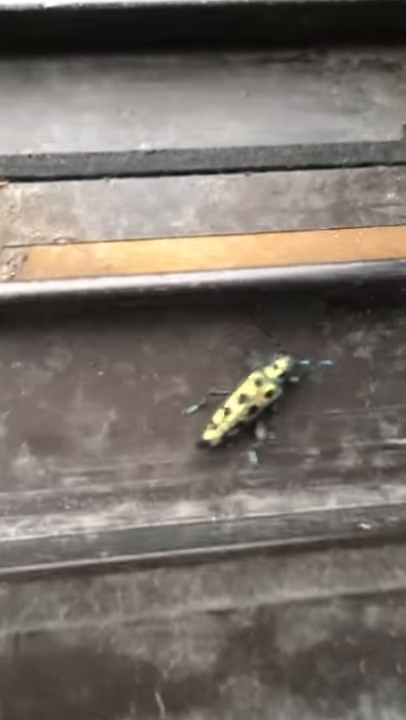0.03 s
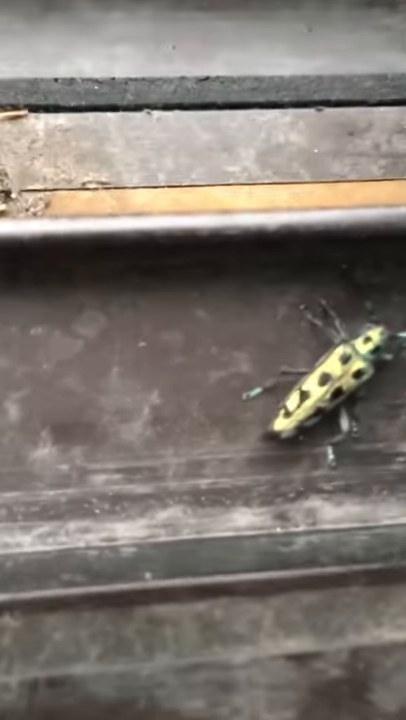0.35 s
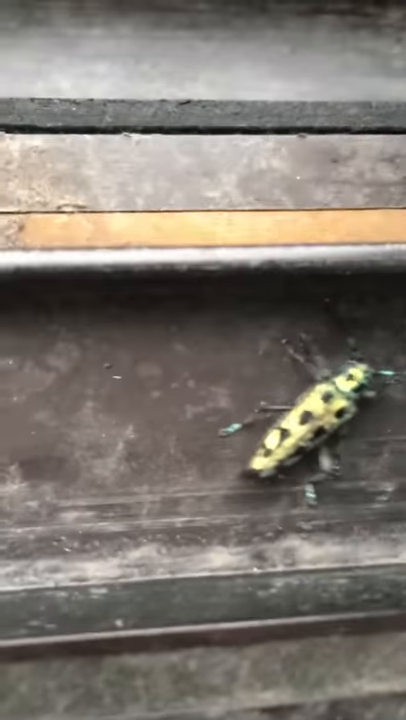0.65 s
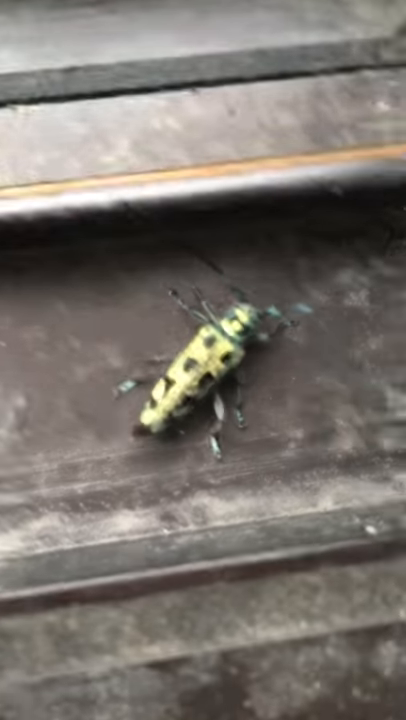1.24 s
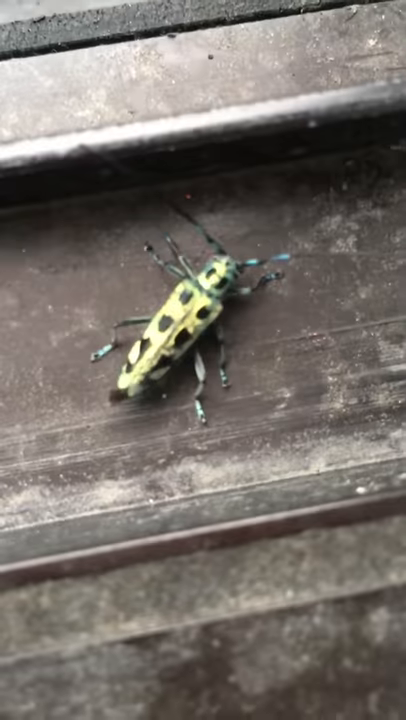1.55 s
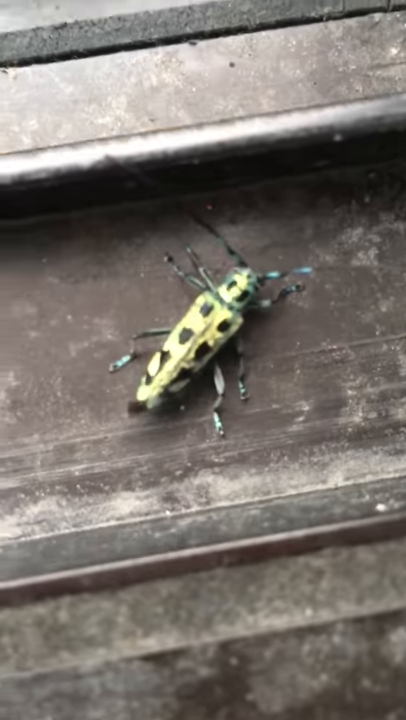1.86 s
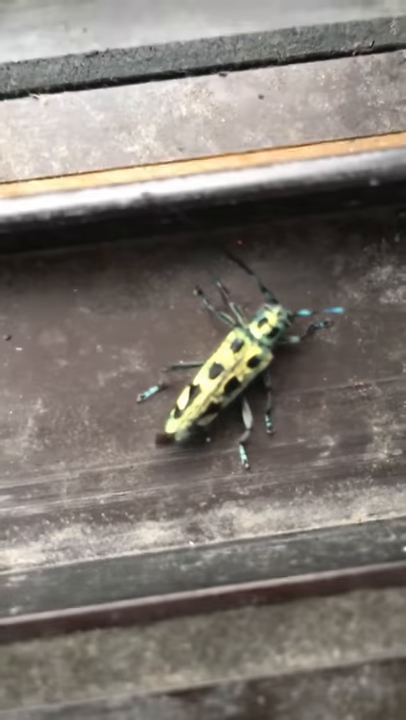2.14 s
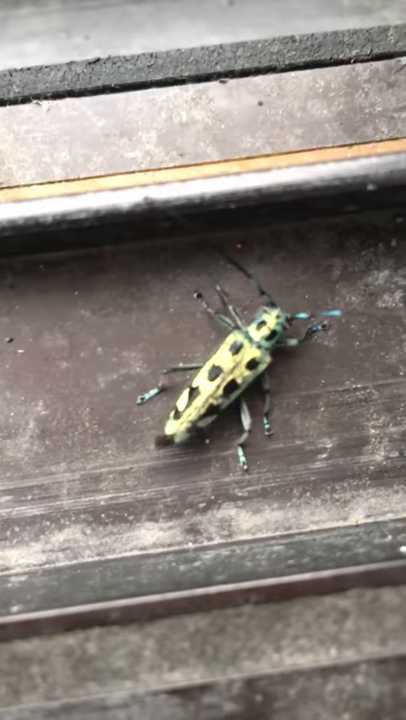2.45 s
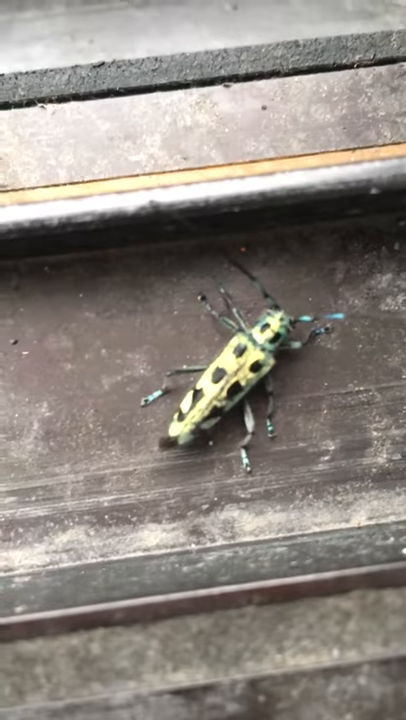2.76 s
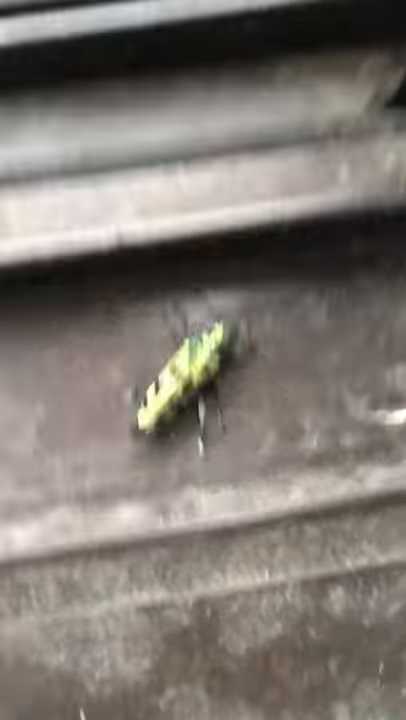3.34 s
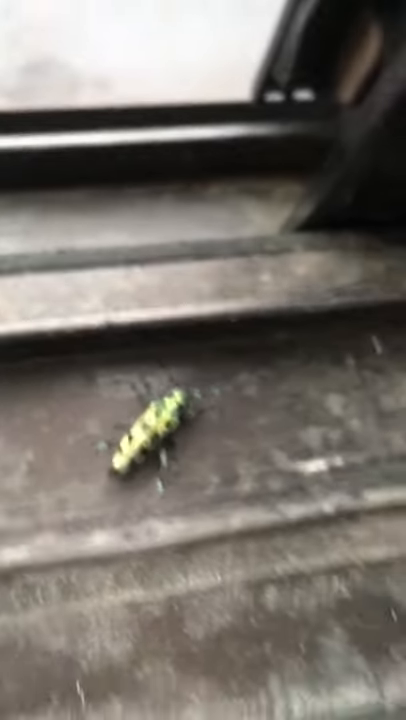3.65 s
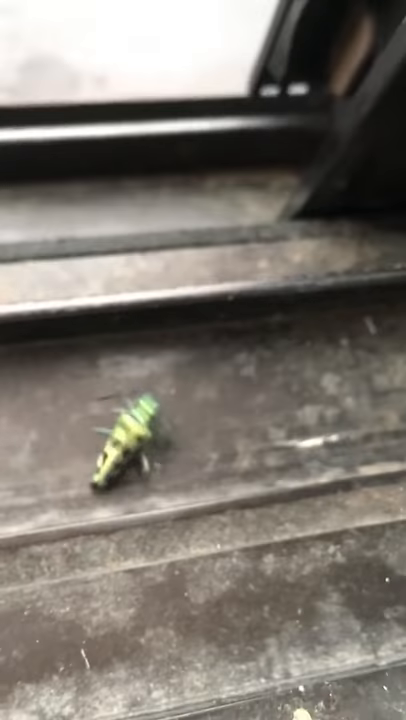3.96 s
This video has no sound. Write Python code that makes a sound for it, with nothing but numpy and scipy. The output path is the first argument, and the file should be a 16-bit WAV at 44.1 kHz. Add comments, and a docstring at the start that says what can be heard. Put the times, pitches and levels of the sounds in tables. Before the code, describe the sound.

Loud, bumpy rumble of a finger on the microphone follows faint bird whistles and light clicks.

```python
"""Over a low hum and distant rumble, a hand settles on a camera and birds whistle faintly outside.
Each bird note is a gliding pure tone that reaches the window with echoes from walls and trees.
The camera ticks and creaks in the grip as small impacts excite the resonances of its case,
and a finger brushes it with a hiss of friction. At the end the finger drags over the microphone,
sticking and slipping with a loud, bumpy rumble."""
import sys
import numpy as np
from scipy import signal
from scipy.fft import rfft, irfft, next_fast_len
from scipy.io import wavfile
from scipy.ndimage import map_coordinates

SR = 44100
rng = np.random.default_rng(int(sys.argv[2]) if len(sys.argv) > 2 else 0)


def int16_out(signal):
    """Quantize to a 16-bit WAV file."""
    q = np.round(np.clip(np.atleast_2d(signal).T, -1, 1) * 32767)
    wavfile.write(sys.argv[1], SR, q.astype(np.int16))


N = 176400
SHARP_RISE_S = 0.00055

# Nearly level whistles. Each row: start and length in seconds, first and last pitch in Hz,
# depth of the opening upward scoop in Hz, level in dB before the direct and echo gains.
WHISTLES = [(0.456, 0.069, 4680, 4480, 0.5, -68), (.86, 0.057, 4280, 4410, 500, -69),
            (1.279, 0.092, 4380, 4710, -2, -70.5), (1.703, 0.082, 4440, 4625, 100, -69),
            (2.164, .06, 4440, 4420, 799, -66), (2.582, .097, 4830, 4795, 700.5, -64.5)]
# Falling slurs. Each row: start and length in seconds, first and last pitch in Hz,
# level in dB before the direct and echo gains.
SLURS = [(1.045, .036, 5120, 4270, -71), (1.14, .08, 5620, 5270, -74.5), (1.453, .08, 5580, 4300, -71.5),
         (1.525, .055, 3450, 3250, -73.5), (1.584, 0.072, 5170, 4950, -73.5),
         (1.875, .095, 5650, 3850, -71), (1.929, 0.052, 3970, 3160, -68.5),
         (2.003, .043, 5520, 5400, -69.5), (2.337, .095, 5500, 3303, -70),
         (2.476, 0.022, 5680, 5150, -68.5), (2.787, 0.053, 5650, 4310, -68.5),
         (2.914, 0.1, 4230, 3880, -72)]

def birds(scoop_s=0.00705, nearest_db=-65):
    """Direct sound weakens with distance: the fainter a note, the more of it is reverberation."""
    t, song, direct = clock(), np.zeros(N), np.zeros(N)
    slurs = [(start, length, first, last, 0, db) for start, length, first, last, db in SLURS]
    for start, length, first, last, scoop, db in WHISTLES + slurs:
        age = np.clip(t - start, 0, length)
        pitch = first * (last / first) ** (age / length) - scoop * np.exp(-age / scoop_s)
        note = amp(db) * wavering_tone(start, start + length, pitch)
        song += note
        direct += amp(min(db - nearest_db, 0)) * note
    walls = amp(-6) * echo(t60=0.15)
    trees = amp(-4.5) * echo(t60=0.7)
    return direct + signal.fftconvolve(song, walls + trees)[:N]


# Pressure of the finger. Each row: time in seconds, rumble level in dB.
PRESSURE = [(3.735, -68), (3.772, -20), (3.965, -21.5), (4, -19.5)]
# Slips of the skin. Each row: start in seconds, thud level in dB, scrape level in dB.
SLIPS = [(3.768, -18.5, -14.5), (3.775, -7, -15), (3.799, -18, -16.5), (3.824, -10, -15.5),
         (3.842, -11, -14), (3.878, -20.5, -23), (3.901, -15, -14.5), (3.92, -8, -17), (3.936, -12.5, -17),
         (3.947, -10, -16), (3.955, -24.5, -24), (3.981, -14.5, -30.5)]
# Friction spectra at the microphone. Each row: frequency in Hz, relative spectral density in dB.
DRAG_RUMBLE = [(25, -30), (50, -5.5), (75, 6.5), (170, 1), (260, -6), (500, -30.5), (2000, -67)]
DRAG_HISS = [(1700, 1), (2400, -7.5), (3700, -12), (4300, -9.5), (4800, -16), (9500, -20), (15500, -30)]
SLIP_SCRAPE = [(60, -12), (280, 8), (450, -2.5), (600, -5.5), (740, -17), (880, -15), (1100, -25),
               (1600, -35.5), (2100, -50), (8000, -77)]

def finger_on_microphone(landing_s=3.768, ring_hz=884.3, thud_hz=118, rise_s=0.0016):
    """Stick-slip friction: the landing rings the case, the drag rumbles, each slip thuds and scrapes."""
    t = clock()
    contact = np.clip((t - landing_s) / 0.045 + 1, 0, 1)  # complete at the landing
    rumble = amp(np.interp(t, *np.transpose(PRESSURE))) * noise(DRAG_RUMBLE)
    out = contact * (rumble + amp(-57) * noise(DRAG_HISS))
    out += amp(-27.5) * np.sin(2 * np.pi * ring_hz * t) * decay(landing_s, rise_s, t60=0.11)
    scrape = noise(SLIP_SCRAPE)
    for start, thud_db, scrape_db in SLIPS:
        pitch = thud_hz * np.exp(0.2 * rng.standard_normal())
        thud = np.sqrt(2) * np.sin(2 * np.pi * pitch * (t - start))
        out += amp(thud_db) * thud * decay(start, rise_s, t60=0.075)
        out += amp(scrape_db) * scrape * decay(start, rise_s, t60=0.049)
    return out


# Clicks of the case. Each row: start in seconds, 60 dB decay time in seconds,
# then the levels in dB of the low knock, middle ring, bright ring and tick.
CLICKS = [(.426, 0.017, -76, -66, -66, -54.5), (.434, 0.033, -59.5, -55, -60.5, -58),
          (.672, 0.027, -53.5, -77, -78, -88), (.692, 0.018, -54, -63, -46, -63),
          (0.721, 0.068, -62, -53.5, -57, -61), (.798, 0.012, -78, -67, -51.5, -54.5),
          (3.172, 0.012, -48, -65, -58, -51), (3.491, 0.042, -52, -59, -73, -67),
          (3.502, 0.0095, -55.5, -60, -65.5, -60.5), (3.682, 0.017, -77, -59.5, -65, -66),
          (3.707, 0.0091, -75, -85, -78, -52.5)]
# Spectra of those four resonances. Each pair: frequency in Hz, relative spectral density in dB.
CASE_RESONANCES = [
    [(600, -17), (1150, -2), (1400, -5), (1550, -9), (1800, -8.5), (3000, -34)],
    [(1500, -32), (2500, -8), (2850, -3), (3250, 3.5), (5000, -34)],
    [(3500, -20), (5100, 2), (6800, -5.5), (8300, -6.5), (9600, -19.5)],
    [(4000, -42), (8000, 7), (15500, -2.5)],
]

def case_clicks(tap_s=3.491, tap_hz=1395):
    """Impact excitation: each click mixes the damped resonances anew; one tap leaves a tone ringing."""
    out = amp(-53) * np.sin(2 * np.pi * tap_hz * clock()) * decay(tap_s, SHARP_RISE_S, t60=0.085)
    for k, spectrum in enumerate(CASE_RESONANCES):
        envelope = sum(amp(db[k]) * decay(start, SHARP_RISE_S, t60) for start, t60, *db in CLICKS)
        out += envelope * noise(spectrum)
    return out


# The stroke over the case. Each row: time in seconds, hiss level in dB.
BRUSH_STROKE = [(2.1, -91), (2.16, -79.5), (2.3, -76), (2.38, -78.5), (2.53, -74), (2.82, -93.5)]
# Friction spectra of the stroke. Each row: frequency in Hz, relative spectral density in dB.
BRUSH_HISS = [(1500, -9.5), (7000, -12), (8600, -0.5), (12800, -3), (13600, -16)]
BRUSH_RUSTLE = [(100, -25), (400, 0.5), (1100, -7.5), (4000, -27)]

def finger_brush():
    """Sliding friction of skin on the case makes broadband noise: a fine hiss above a soft rustle."""
    level_db = np.interp(clock(), *np.transpose(BRUSH_STROKE)) + 0.89 * wobble(52)
    return amp(level_db) * (noise(BRUSH_HISS) + amp(9) * noise(BRUSH_RUSTLE))


# Spectrum of the settling hand. Each row: frequency in Hz, relative spectral density in dB.
GRIP_RUSTLE = [(1200, -8), (1900, 3), (2900, -8), (10000, -17)]

def grip():
    """Friction noise decays as the hand settles, with a thin, frequency-modulated squeak."""
    squeak_hz = 11700 + 450 * np.sin(2 * np.pi * 6.7 * clock())
    squeak = amp(-86.5) * wavering_tone(start=0, end=0.29, hz=squeak_hz)
    rustle = amp(-72) * noise(GRIP_RUSTLE) * decay(0, SHARP_RISE_S, t60=2)
    return squeak + rustle


# Spectrum of distant rumble and faint hiss. Each row: frequency in Hz, relative spectral density in dB.
BACKGROUND = [(20, -32.5), (50, -6.5), (90, -5.5), (120, -17), (165, -10), (290, -19), (500, -25),
              (900, -29.5), (1500, -39), (2700, -41.5), (3400, -39.5), (6500, -44.5), (10300, -51)]

def ambience(hum_hz=56.1):
    """A noise floor lies under a low hum, randomly modulated in frequency and amplitude."""
    pitch = hum_hz + 1.47 * wobble(5)
    hum = np.sqrt(2) * np.sin(2 * np.pi * np.cumsum(pitch) / SR)
    rumble = amp(-57 + 0.26 * wobble(4.16)) * noise(BACKGROUND)
    return rumble + amp(-58 + 2.5 * wobble(4.7)) * hum


def wavering_tone(start, end, hz, attack_s=0.014, release_s=0.006):
    """Slight random modulation makes a softly gated sinusoid waver in pitch and level."""
    t = clock()
    gate = np.clip((t - start) / attack_s, 0, 1) * np.clip((end - t) / release_s, 0, 1)
    phase = 2 * np.pi * np.cumsum(hz * (1 + 0.007 * wobble(120))) / SR
    flutter = amp(2.2 * wobble(53))
    return np.sqrt(2) * gate * flutter * np.sin(phase)


def echo(t60):
    """Diffuse scattering gives an impulse response of decaying noise, here of energy 1."""
    tail = rng.standard_normal(N) * decay(0, SHARP_RISE_S, t60)
    return tail / np.linalg.norm(tail)


def decay(start, rise, t60):
    """Exponential damping: after a quick rise, the envelope falls 60 dB in t60 seconds."""
    age = np.maximum(clock() - start, 0)
    return (1 - np.exp(-age / rise)) * np.exp(-np.log(1000) * age / t60)


def noise(spectrum):
    """Spectral shaping: white noise is filtered to follow (Hz, dB) points, then scaled to rms 1."""
    points_hz, points_db = np.transpose(spectrum)
    hz = np.fft.rfftfreq(N, 1 / SR)
    gain = amp(np.interp(np.log(hz + 1), np.log(points_hz), points_db))
    shaped = irfft(rfft(rng.standard_normal(N)) * gain, N)
    return shaped / np.sqrt(np.mean(shaped ** 2) + 1e-20)


def wobble(rate):
    """Spline interpolation draws a smooth curve through rate random knots a second."""
    return map_coordinates(rng.standard_normal(int(N * rate / SR) + 4), [clock() * rate])


def amp(db):
    """Amplitude ratio of a level in decibels."""
    return 10 ** (np.asarray(db) / 20)


def clock():
    """Time of every sample in seconds."""
    return np.arange(N) / SR


def scene():
    """Superposition: the pressures of all sources add at one microphone."""
    return (ambience() + birds() + grip() + case_clicks() + finger_brush() + finger_on_microphone())[None]


def record(dry, low_cut_hz=27, top_hz=15850, fade_s=0.003):
    """Band limiting: the camera cuts the deepest bass and highest treble; a brief fade ends the sound."""
    highpassed = signal.sosfilt(signal.butter(2, low_cut_hz, "highpass", fs=SR, output="sos"), dry)
    fade = np.sin(np.pi / 2 * np.clip((N / SR - clock()) / fade_s, 0, 1)) ** 2
    padded = next_fast_len(N + SR // 2)
    passband = np.fft.rfftfreq(padded, 1 / SR) < top_hz
    return irfft(rfft(highpassed * fade, padded) * passband, padded)[:, :N]


dry = scene()
out = record(dry)
int16_out(out)
```